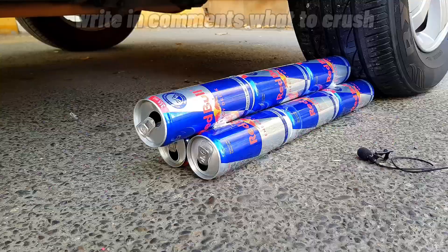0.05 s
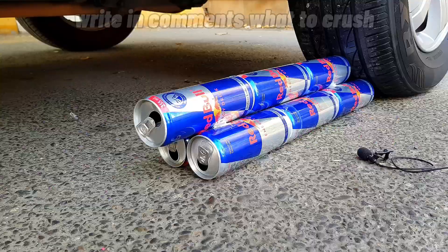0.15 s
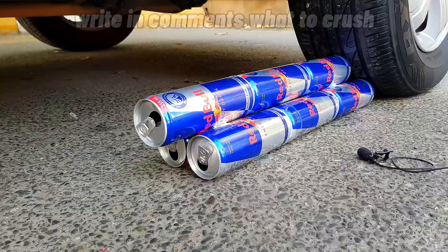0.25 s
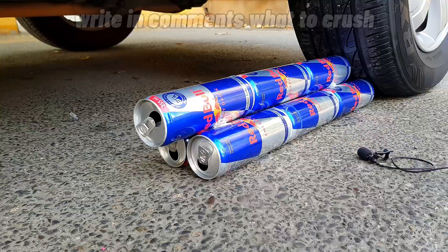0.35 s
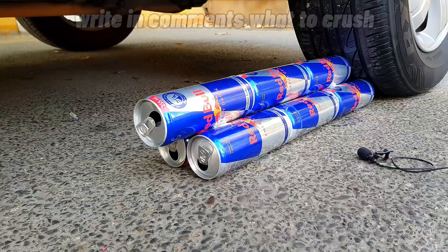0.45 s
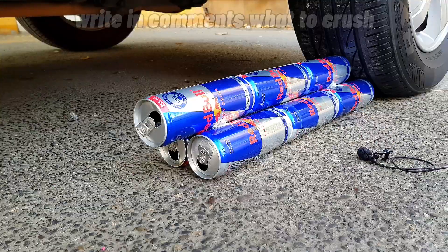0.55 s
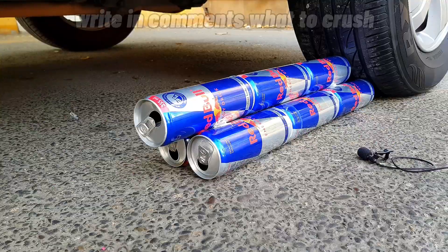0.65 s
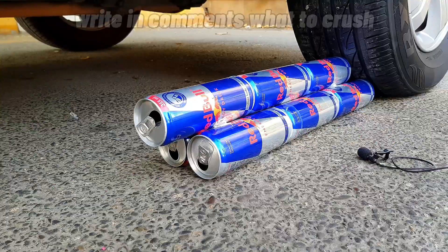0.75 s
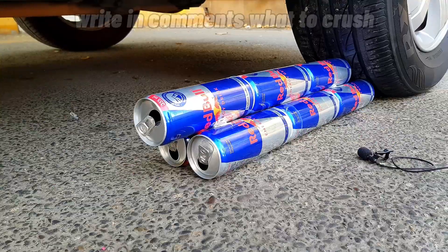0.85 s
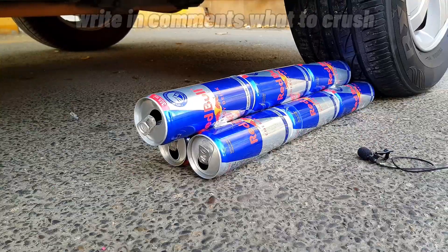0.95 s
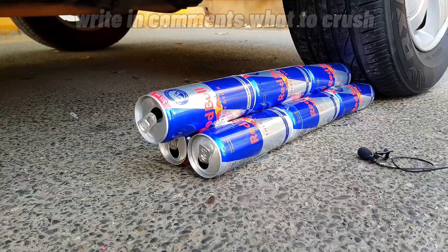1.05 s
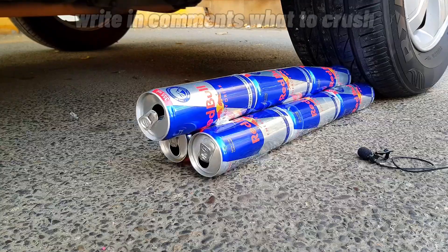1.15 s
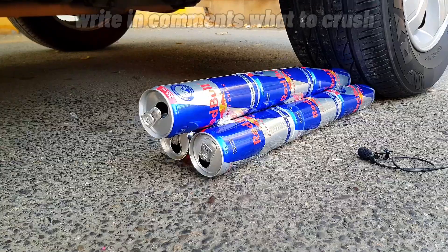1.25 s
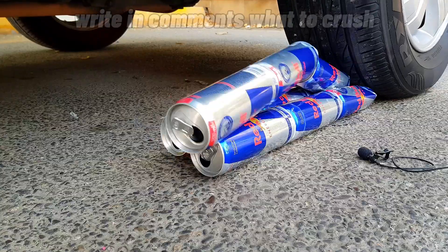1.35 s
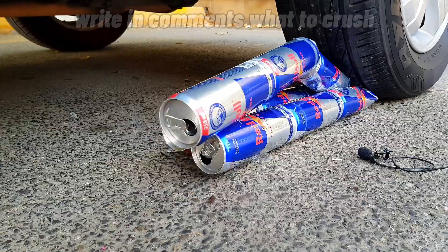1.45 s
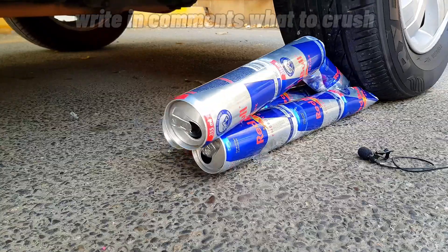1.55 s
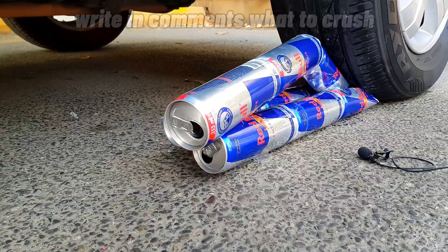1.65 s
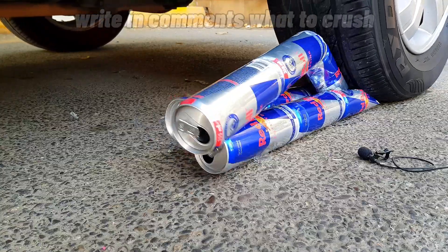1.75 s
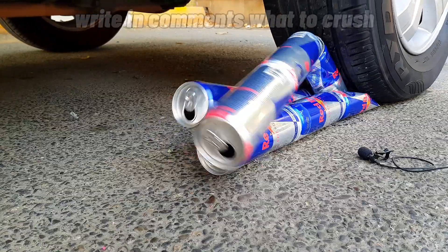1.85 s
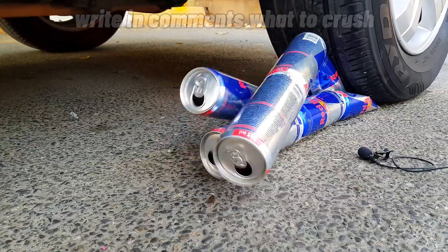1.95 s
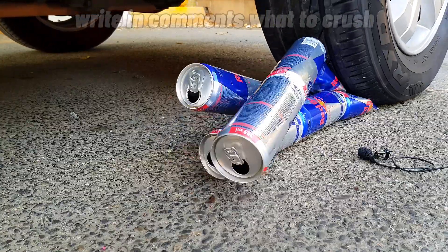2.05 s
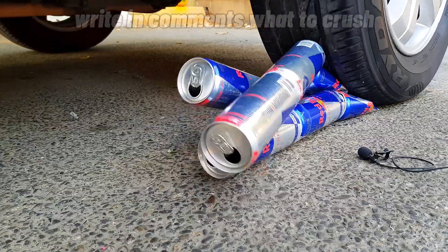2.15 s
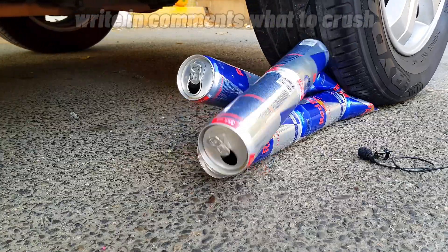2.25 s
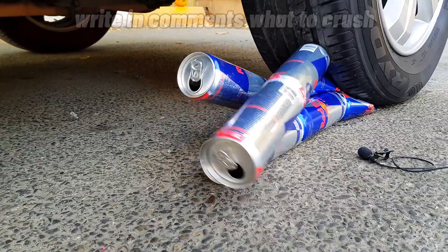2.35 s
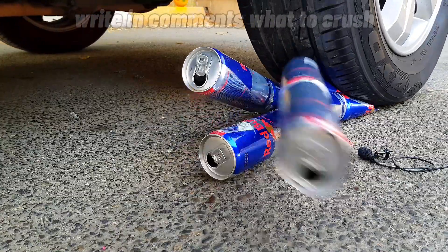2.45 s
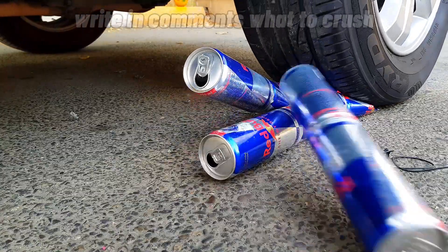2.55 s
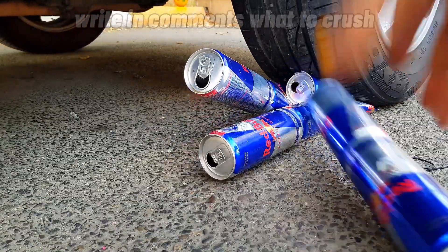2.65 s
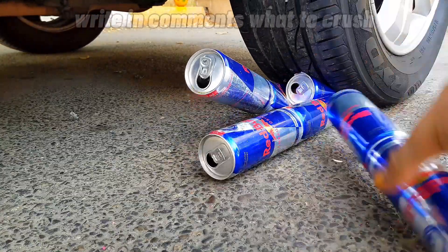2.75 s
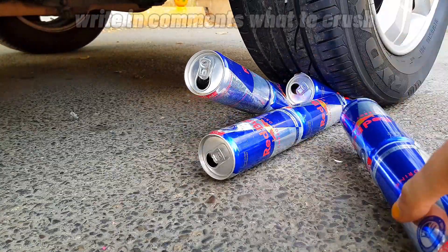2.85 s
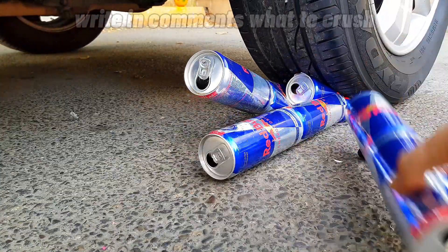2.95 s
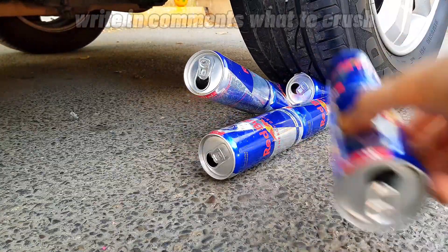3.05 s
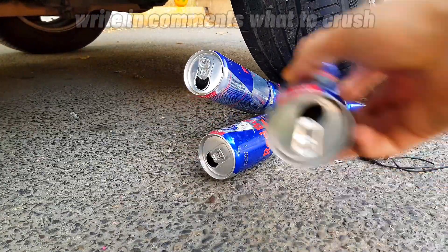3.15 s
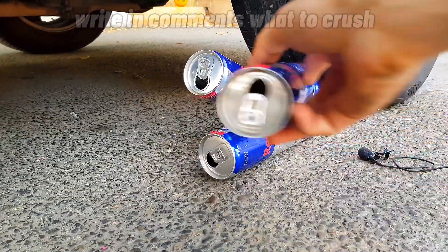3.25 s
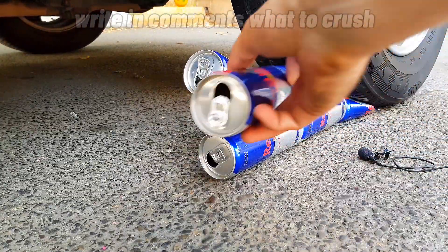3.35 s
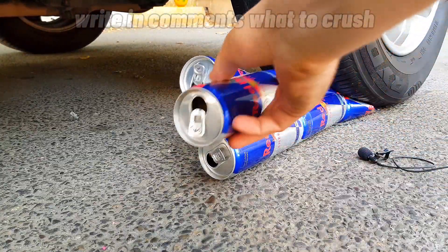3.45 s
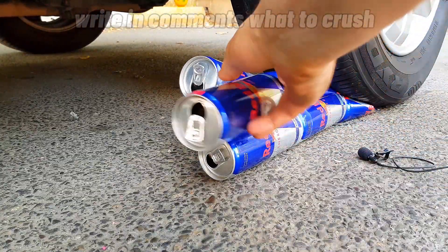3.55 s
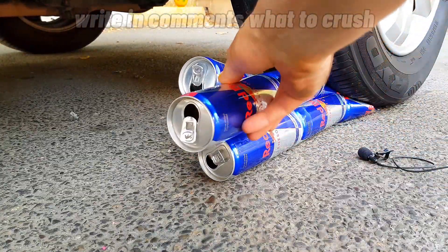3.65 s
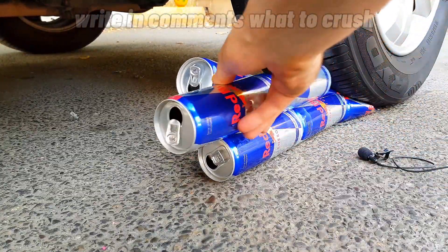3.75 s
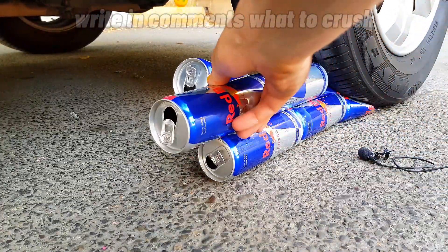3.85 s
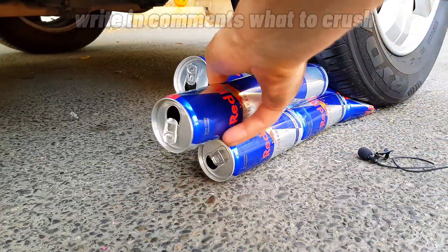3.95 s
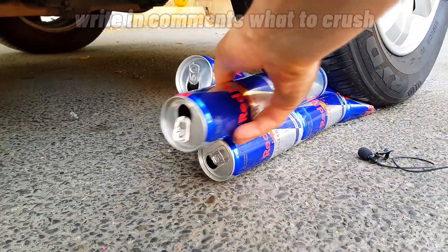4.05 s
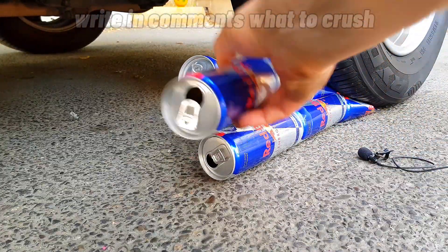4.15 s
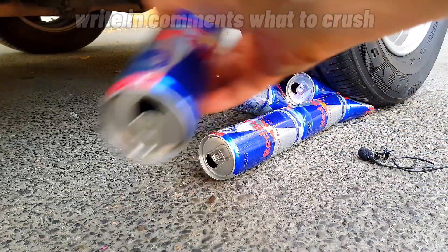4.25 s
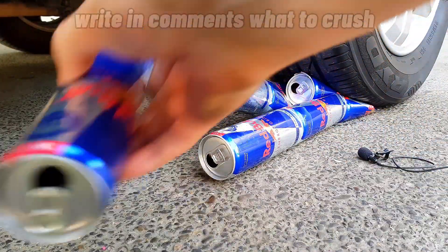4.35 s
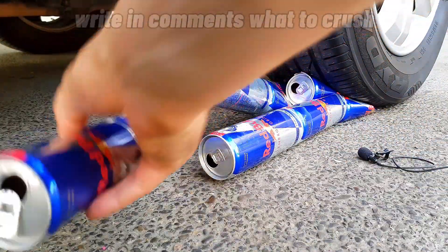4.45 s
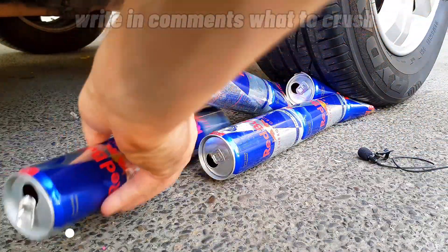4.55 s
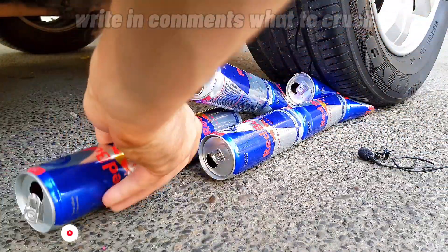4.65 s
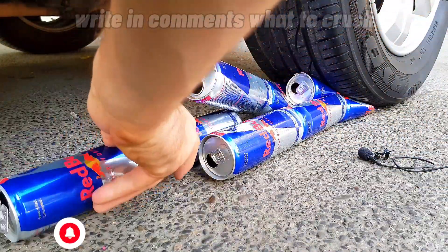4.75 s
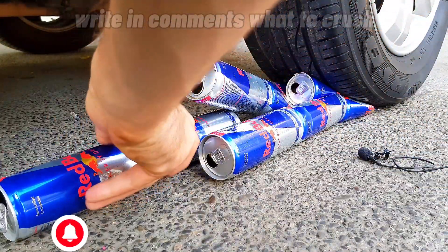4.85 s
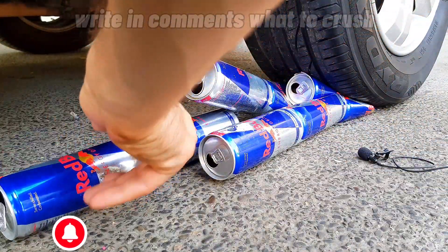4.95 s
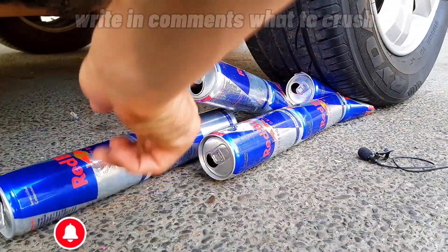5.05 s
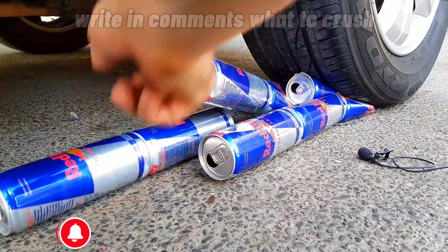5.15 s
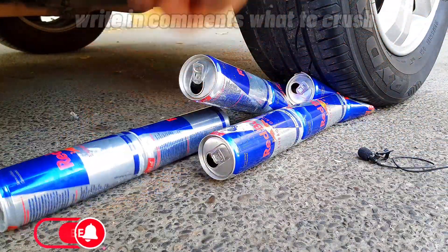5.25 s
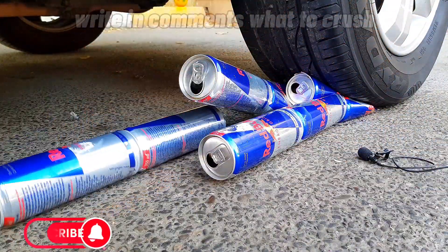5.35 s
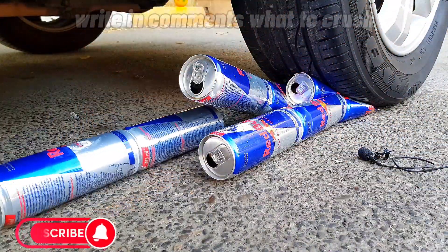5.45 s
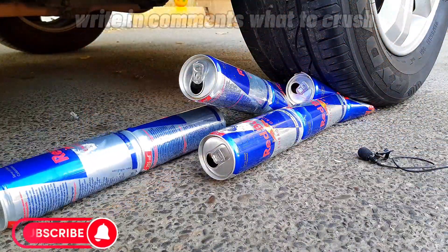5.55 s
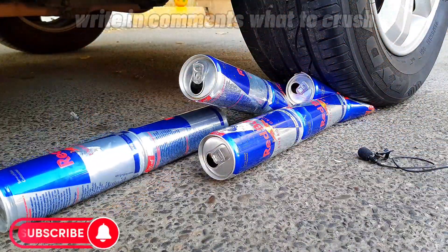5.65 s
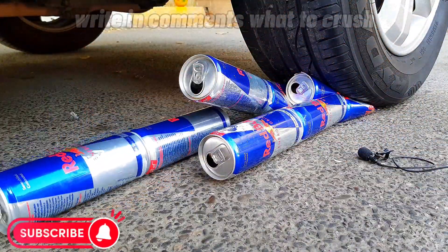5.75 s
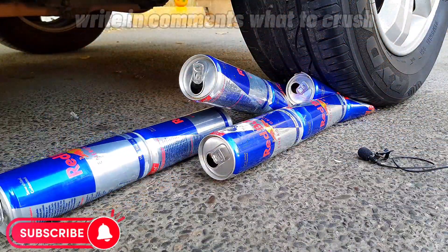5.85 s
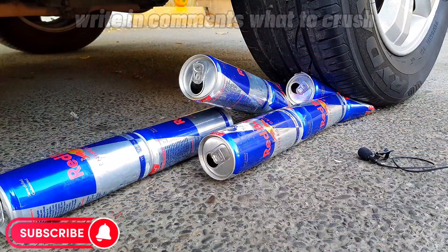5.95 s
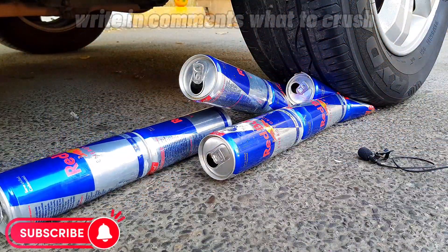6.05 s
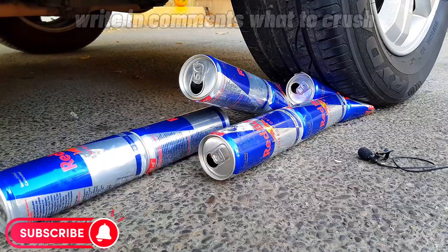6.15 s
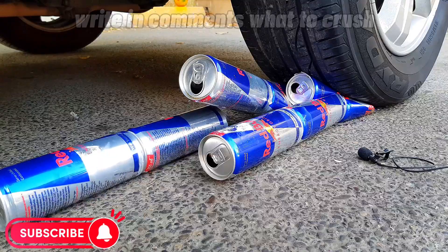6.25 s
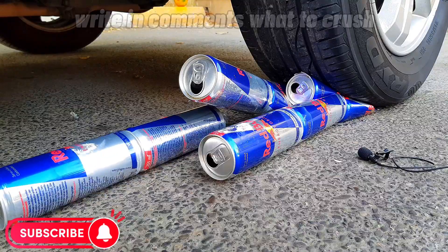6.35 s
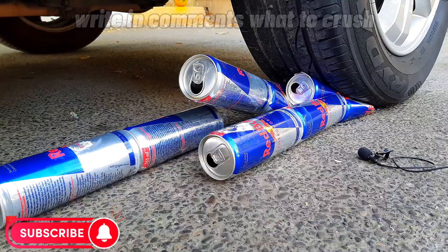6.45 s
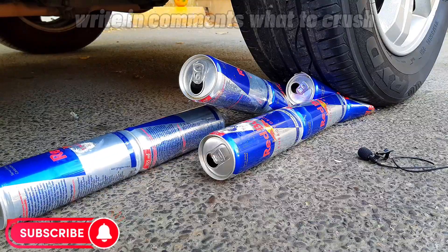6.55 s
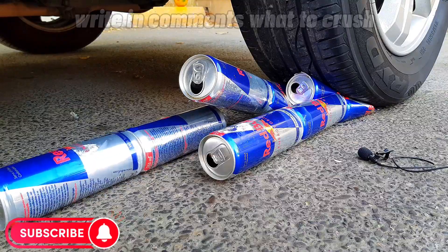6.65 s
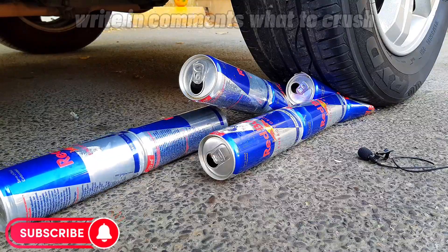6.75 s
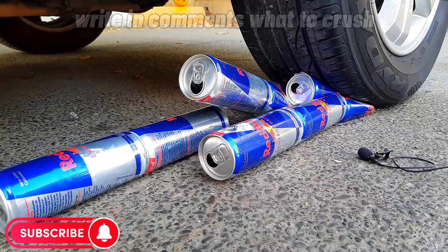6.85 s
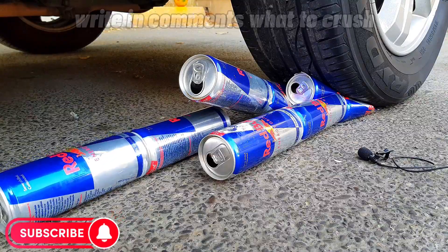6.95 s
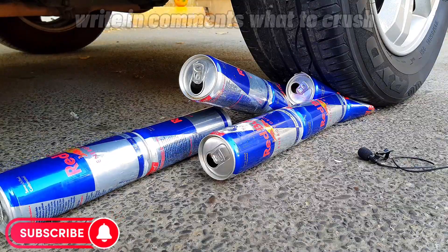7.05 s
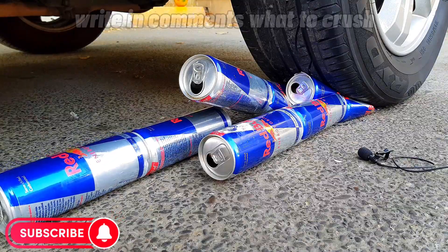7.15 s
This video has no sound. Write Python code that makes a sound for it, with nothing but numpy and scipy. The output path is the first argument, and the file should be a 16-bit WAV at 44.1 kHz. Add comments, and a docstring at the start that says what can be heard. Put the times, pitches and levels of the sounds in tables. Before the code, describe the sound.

A car idles, thin aluminium cans crunch and pop under its wheel, a stack clatters on asphalt, is handled, then only the idle remains.

```python
"""Taped stacks of empty drink cans buckle in sharp cracks under a car tyre, close to a small microphone.
Each crack is a click, a burst of fading noise and the notes of the dent and the new folds.
One stack springs free, clangs on the asphalt as a set of ringing notes, and is put back by hand with a rustle.
Air and ground give low thumps. Behind it the car idles, a throb of sine waves and noise that
sinks under the crunching and swells up again once it is quiet."""
import sys
import numpy as np
from scipy import signal
from scipy.io import wavfile

SR = 44100
rng = np.random.default_rng(int(sys.argv[2]) if len(sys.argv) > 2 else 0)


def generate_wav(sig):
    """Save sig (samples, or channels by samples) to the path in sys.argv[1] as 16-bit PCM at SR."""
    pcm = np.round(np.clip(np.atleast_2d(sig).T, -1, 1) * 32767).astype(np.int16)
    wavfile.write(sys.argv[1], SR, pcm)


N = 317508   # length in samples

# Speed of the idling engine: time_s, firings_per_s
IDLE_SPEED = [(0, 23.6), (5.1, 23.6), (5.2, 23.4), (6.1, 23.4), (6.2, 23.6), (7.2, 23.55)]
# Strength of each exhaust tone, before scaling: multiple_of_firing_rate, level_db
EXHAUST_TONES = [(1, -22), (2, -0.5), (3, 1), (4, -0.5), (5, -16), (6, -12), (7, -11), (8, -11.5),
                 (9, -21.5), (10, -14.5), (11, -17), (12, -15), (13, -15.5), (14, -17), (15, -28)]
# Colour of the engine hiss, before scaling: frequency_hz, level_db_per_hz
ENGINE_NOISE = [(90, -18.5), (200, -12.5), (320, -15), (410, -17.5), (600, -16.5), (1400, -25), (2000, -26),
                (6400, -37), (8000, -39), (13800, -44.5), (16000, -50.5)]
# Faint whistles in the engine hiss, relative to the exhaust: pitch_hz, width_hz, level_db
WHISTLES = [(604, 50, -23), (1770, 230, -27), (3182, 90, -33), (4360, 120, -36), (6350, 61, -34),
            (8100, 1500, -25), (8560, 130, -34.5), (8900, 80, -44), (11740, 200, -39), (13630, 130, -41)]
# Pushes of air and ground shock from big buckles and drops, before the low cut: start_s, level_db, length_ms
THUMPS = [(0.91, -8, 4.6), (1.118, -14.5, 2.2), (1.206, -13, 3.9), (1.311, -14, 3.8), (1.417, -11, 2),
          (1.587, -7, 4.4), (1.785, -11, 5), (1.988, -16, 6.2), (2.07, -12, 7.3), (2.149, -16.5, 4.9),
          (2.395, -15.5, 4.5), (2.562, -15.5, 7.6), (2.714, -1.5, 4), (2.824, -9.5, 5.7), (2.865, -16, 6.5),
          (3.076, -37, 3), (3.233, -24, 1.7), (3.278, -18.5, 5.2)]
# Fingers and tape sliding on the cans: loudest_s, level_db
SLIDES = [(3.28, -46.5), (3.36, -56), (3.44, -42.5), (3.72, -45.5), (3.82, -53.5), (3.93, -61),
          (4.06, -54.5), (4.138, -43.5), (4.64, -54), (4.76, -56)]
# The loose stack skids over the grit: start_s, end_s, level_db, fade_db_per_s
SKIDS = [(2.574, 2.722, -27.5, 112), (2.707, 2.903, -16.5, 78), (3.223, 3.42, -33, 170),
         (4.612, 4.713, -30.5, 250)]
# The stacks shake under the tyre, one row: start_s, end_s, level_db
SHAKE = (0.79, 2.9, -52.5)
# Ringing notes of a free stack, relative levels: pitch_hz, level_db, t60_s (time to fall by 60 dB)
STACK_NOTES = [(340, -21.5, 0.27), (744, -13.5, 0.41), (895, -8, 0.038), (1029, -13, 0.58),
               (1375, -21, 0.14), (1450, -17.5, 0.36), (1560, -15.5, 0.39), (1666, -11.5, 0.26),
               (1760, 3, 0.12), (1822, -15.5, 0.25), (1860, -16, .2), (2200, -17.5, .3), (2277, -12.5, 0.2),
               (2380, -14.5, 0.2), (2490, -19, 0.36), (2780, -23.5, 0.083), (3130, -17.5, 0.15),
               (3340, -21, 0.083), (3720, -7.5, 0.028), (3510, -11, 0.12), (3720, -23, 0.067),
               (3700, -19.5, 0.086)]
# Knocks on a stack, shorter when it is held, relative levels:
# start_s, peak_db, share_of_free_ring (0-1), hardness_db_per_octave
KNOCKS = [(1.304, -4, .84, -4.5), (1.416, -11, 1, 2), (2.395, -7.5, 0.73, 8), (2.489, -20, 0.8, -1),
          (2.56, 13, 0, -3.5), (2.717, -7, .05, 1), (2.728, -12.5, 1, 16.5), (2.78, -14.5, .9, -7),
          (3.077, -17, 0.03, -3), (3.23, -0.5, 0.09, -15), (3.281, -25, .6, -3), (3.884, -10, 0.54, 1),
          (4.06, -14, 0.96, -1), (4.613, -19.5, 0.45, 1), (4.625, -16, 0.9, -7.5), (4.754, -21, 0.9, -7)]
# How the thin can wall colours a crack: frequency_hz, level_db
CAN_WALL = [(250, 5), (420, 0.5), (700, 2), (1800, -0.5), (3000, -4.5), (6000, -4), (9000, -4), (12000, -6),
            (16000, -27.5)]
# Buckling walls, relative levels: start_s, snap_db, boom_db, dent_db, dent_pitch_hz, t60_s (basic fading time)
CRACKS = [(0.617, -26, -37, -42, 2150, 0.05), (0.6794, 1, -41, -13, 2146, 0.059),
          (0.7093, -44, -32, -10.5, 2170, 0.04), (0.7809, 0, -33.5, -13.5, 2300, 0.054),
          (0.8303, 1, -21.5, -9.5, 830, 0.052), (0.849, 1, -31.5, -18, 2550, 0.047),
          (0.8734, -8, -29, -17, 2680, 0.04), (0.9022, -9, -40, -14, 1447, 0.1),
          (0.9071, 8.5, -21.5, -16, 3140, 0.05), (0.952, 2, -31, -7.5, 1440, 0.053),
          (0.9885, -10.5, -22, -18.5, 1920, 0.033), (1.0266, -1, -24, -17.5, 3000, 0.036),
          (1.0323, -1, -21, -10, 2550, 0.032), (1.0712, -21, -40, -36, 2960, 0.05),
          (1.0782, -1.5, -15, -7.5, 1960, 0.05), (1.0964, -16, -43, -17, 2330, 0.017),
          (1.1137, -6, -23, -11, 2180, 0.041), (1.1204, -3, -20.5, -6, 1920, 0.042),
          (1.1329, -3, -23, -13, 2210, 0.04), (1.1494, -13, -40, -28, 1720, 0.046),
          (1.1648, -10, -28, -22.5, 942, 0.048), (1.1902, -4, -6.5, -16.5, 1340, 0.028),
          (1.2037, 8.5, -22, -16.5, 1105, 0.049), (1.218, -2.5, -29, -21, 1020, 0.071),
          (1.239, 0.5, -28.5, -18.5, 3170, 0.028), (1.2553, -5.5, -32.5, -18, 3290, 0.048),
          (1.284, 1, -26.5, -22.5, 1460, 0.042), (1.3036, 2, -10.5, -5, 1638, 0.098),
          (1.3139, 7, -18.5, -6, 1942, 0.12), (1.3638, -2, -38, -13, 1480, 0.039),
          (1.3708, -0.5, -31.5, -13.5, 1350, 0.064), (1.4073, 0.5, -23.5, -16, 3340, 0.04),
          (1.4159, 4, -16, -9, 860, 0.047), (1.4306, 1, -24, -10.5, 1724, 0.043),
          (1.46, -15, -29, -19.5, 1900, 0.066), (1.4952, -12.5, -16, -11, 840, 0.029),
          (1.5567, -12.5, -14.5, -16, 925, 0.018), (1.574, -10, -35, -19.5, 1840, 0.05),
          (1.585, 8.5, -19, -12, 845, 0.082), (1.6359, 1, -15, -6.5, 874, 0.042),
          (1.6803, -1, -20, -19, 2080, 0.054), (1.7181, 2, -28, -10, 2890, 0.024),
          (1.7758, -1, -18, -25, 2560, 0.041), (1.7854, 2, -22, -30, 1765, 0.09),
          (1.8004, 1.5, -15, -11.5, 840, 0.036), (1.8228, -15, -53, -19, 1780, 0.038),
          (1.8444, -20, -20.5, -28, 802, 0.073), (1.8665, 1, -14, -21, 1320, 0.055),
          (1.8843, -9, -37, -12, 2210, 0.06), (1.904, 1, -19.5, -15.5, 890, 0.035),
          (1.9249, -7.5, -14, -7.5, 2220, 0.05), (1.9509, 3.5, -14, -5, 830, 0.026),
          (1.9758, -12, -23.5, -16.5, 2180, 0.077), (1.9849, 7, -10, -18, 1130, 0.077),
          (2.0144, -15, -20, -16.5, 844, 0.12), (2.0255, 1, -20, -13, 2030, 0.043),
          (2.046, -29, -25, -11, 2030, 0.05), (2.0718, 4, -10, -20, 1430, 0.034),
          (2.096, -19, -26, -24, 2810, 0.14), (2.1167, -1, -28, -33, 2640, 0.027),
          (2.15, 2, -14, -13.5, 1500, 0.041), (2.176, -19, -45, -19.5, 2680, 0.038),
          (2.1983, -15, -21, -16, 1880, 0.058), (2.2067, -7, -17, -11.5, 3150, 0.02),
          (2.212, -15, -14, -11, 2240, 0.035), (2.2334, -4.5, -31.5, -22, 3160, 0.034),
          (2.2494, -13, -18, -26, 1860, 0.033), (2.2858, -4.5, -18, -25.5, 1740, 0.044),
          (2.2942, 2.5, -23, -13.5, 1570, 0.025), (2.3064, -14.5, -34.5, -18, 2990, 0.045),
          (2.3234, -19, -26.5, -21.5, 1770, 0.075), (2.3531, -8.5, -12, -12.5, 1740, 0.034),
          (2.3844, -5, -26, -23, 810, 0.079), (2.393, 2, -21.5, -9.5, 1770, 0.062),
          (2.4279, -17, -34, -5, 3060, 0.026), (2.4363, -4.5, -48, -18, 1800, 0.019),
          (2.4484, -6.5, -42, -22, 1730, 0.043), (2.459, -6, -30, -26, 1630, 0.039),
          (2.4762, -3.5, -27, -29, 1290, 0.019), (2.489, -15, -25, -23.5, 1700, 0.023),
          (2.544, -22, -28.5, -39, 1580, 0.045), (2.559, -2.5, -23, -5, 1776, 0.084),
          (2.5724, -12.5, -36.5, -15.5, 1920, 0.041), (2.599, -7, -50, -16, 1740, 0.026),
          (2.6054, -14.5, -41.5, -15, 1910, 0.047), (2.6554, -26, -30, -19.5, 1850, 0.036),
          (2.6751, -13, -43, -17, 1770, 0.094), (2.7113, -1.5, -5, -16, 942, 0.018),
          (2.7176, -7, -14, -9, 1730, 0.038), (2.7258, -16, -25, -8, 1765, 0.087),
          (2.7803, -8.5, -22, -19, 1770, 0.02), (2.794, -30, -30, -31, 1680, 0.022),
          (2.8273, -20, -40, -21, 1720, 0.038), (2.8406, -7, -29, -28, 1770, 0.044),
          (2.8568, -19, -28, -23, 1770, 0.04), (2.8767, -25, -41, -22, 1770, 0.093),
          (2.9257, -25, -48, -36, 980, 0.05), (3.0147, -12, -50, -31, 2440, 0.037),
          (3.0749, -0.5, -16, -33, 1050, 0.032), (3.101, -18, -62.5, -40, 2450, 0.03),
          (3.1464, -58, -28, -29, 818, 0.054), (3.2012, -20, -35, -36, 2170, 0.018),
          (3.2301, -25, -12, -11.5, 1850, 0.057), (3.277, -21.5, -41, -27.5, 1860, 0.1),
          (3.4493, 0.5, -34, -39, 2200, 0.018), (3.4676, -19.5, -41, -35, 1990, 0.04),
          (3.5481, -36, -47, -27, 2930, 0.025), (3.5547, -8.5, -54, -31.5, 2510, 0.043),
          (3.6328, -11, -31, -27, 2400, 0.042), (3.6408, -17, -32, -23, 2510, 0.039),
          (3.6558, -20, -52, -33, 2420, 0.019), (3.7543, -16.5, -48, -35, 2380, 0.03),
          (3.7895, -22.5, -51, -38, 2420, 0.031), (3.8847, -0.5, -52, -11.5, 2685, 0.042),
          (3.8921, -5, -49, -24, 1650, 0.033), (3.9185, -24, -42, -35, 1670, 0.025),
          (3.947, -28, -47, -42, 2390, 0.04), (3.9554, -42, -36, -29.5, 890, 0.064),
          (3.9781, -11, -26.5, -19.5, 1930, 0.021), (4.0596, -5.5, -34, -23, 1410, 0.055),
          (4.0717, -5.5, -40, -20.5, 976, 0.056), (4.6112, -27.5, -36, -26, 1800, 0.038),
          (4.6249, -34, -36, -24.5, 1640, 0.069), (4.7366, -41, -41.5, -42, 1350, 0.1),
          (4.753, -17.5, -40, -46, 1750, 0.082), (5.0797, -36.5, -52, -56, 987, 0.072),
          (5.4136, -11.5, -58, -53, 1850, 0.029)]

IDLE_DB, SUNK_DB = -27.5, -44   # exhaust level in the quiet, and under the crunching
SINKS_AT_S, SINK_S, RISES_AT_S, RISE_S = 0.69, .25, 4.85, 1.17   # start and time constant of each change
SLIDE_RISE_DB_PER_S, SLIDE_FALL_DB_PER_S = 358.5, 220
SKID_RISE_S = 0.029
SNAP_HZ, BELOW_SNAP_DB_PER_OCT = 4500, 7.5   # the snap thins out below this corner
BOOM_HZ, BOOM_LOSS_DB_PER_OCT = 640, 11   # the hollow of the can
DENT_OCTAVES = 0.89   # width of the dent's colour
BELOW_DENT_DB, ABOVE_DENT_DB = 8, 6   # loss per dent width on either side
MIC_LOW_CUT_HZ, CUTOFF_HZ = 49, 16900


def from_db(db):
    """Turn a level in dB into a gain."""
    return np.exp(np.asarray(db) * (np.log(10) / 20))


def rms_one(x):
    """Scale a signal to an average strength (rms) of 1."""
    return x / np.sqrt(np.mean(x ** 2) + 1e-20)


def in_time(rows):
    """Draw lines between (time, value) rows, giving one value a sample."""
    return np.interp(np.arange(N) / SR, *np.transpose(rows))


def at_hz(points, hz):
    """Read a spectrum on a log-frequency axis."""
    known_hz, level_db = np.array(points).T
    return np.interp(np.log(hz), np.log(known_hz), level_db)


def drift(rate_hz):
    """Slow random wandering with spread 1: noise smoothed at one value per 40 samples."""
    r = np.exp(-80 * np.pi * rate_hz / SR)
    noise = rng.standard_normal(N // 40 + 2002)
    slow = signal.lfilter([1], [1, -2 * r, r * r], noise)[2000:]   # skip the start-up
    return np.interp(np.arange(N) / 40, np.arange(len(slow)), rms_one(slow))


def ring(clicks, hz, t60):
    """A resonance: each unit click sets a sine of height 1 ringing, 60 dB down after t60 seconds."""
    r = 10 ** (-3 / (t60 * SR))
    w = 2 * np.pi * hz / SR
    return signal.lfilter([0, np.sin(w)], [1, -2 * r * np.cos(w), r * r], clicks + 1e-18)


def bank(x, low_hz):
    """Split sound into third-octave bands, dealing the two rows of x in turn; gives centres and bands."""
    edges = low_hz * 2 ** np.arange(0, np.log2(18000 / low_hz), 1 / 3)
    bands = []
    for k, edge in enumerate(zip(edges, edges[1:])):
        band_pass = signal.butter(2, edge, "band", fs=SR, output="sos")
        bands.append(signal.sosfilt(band_pass, x[k % 2]))
    return np.sqrt(edges[1:] * edges[:-1]), np.array(bands)


def idle_db():
    """The idle level sinks near the start of the crunching and creeps back late, at set times."""
    t = np.arange(N) / SR
    sinking = 1 - np.exp(-np.maximum(t - SINKS_AT_S, 0) / SINK_S)
    returning = np.exp(-np.maximum(t - RISES_AT_S, 0) / RISE_S)
    return IDLE_DB + (SUNK_DB - IDLE_DB) * sinking * returning


def engine():
    """Firings drive exhaust tones, the lowest lagging most in the pipe; noise throbs along, more in the bass."""
    turns = np.cumsum(in_time(IDLE_SPEED)) / SR + 0.305   # firings so far
    waver_db, pulse_db, pipe_lag = 1.3, 4.5, 113   # the lag is in radians
    exhaust = 0
    for k, db in EXHAUST_TONES:
        height = from_db(db + waver_db * drift(5.2))
        exhaust = exhaust + height * np.cos(2 * np.pi * k * turns + pipe_lag / k + 0.14 * drift(6.0))

    hz, bands = bank(rng.standard_normal((2, N)), low_hz=101.4)
    throb_db = pulse_db * (300 / hz[:, None]) ** 1.2 * np.cos(2 * np.pi * turns + 0.42)
    noise_gain = from_db(at_hz(ENGINE_NOISE, hz)[:, None] + throb_db)
    hiss = rms_one(np.sum(noise_gain * bands, axis=0))

    white = rng.standard_normal(N)
    whistles = 0
    for hz, width, db in WHISTLES:
        t60 = np.log(1000) / (np.pi * width)   # a narrow whistle rings longer
        whistles = whistles + from_db(db + 1.6 * drift(14.0)) * rms_one(ring(white, hz, t60))
    return from_db(idle_db()) * (rms_one(exhaust) + from_db(-11.0) * hiss + whistles)


def thumps():
    """Smooth one-sided pulses of pressure; the microphone's low cut turns them into falling booms."""
    out = np.zeros(N)
    for s, level_db, length_ms in THUMPS:
        pulse = np.hanning(max(round(length_ms * SR / 1000), 9))
        out[round(s * SR):][:len(pulse)] -= from_db(level_db) * pulse
    low_cut = signal.butter(4, MIC_LOW_CUT_HZ, "high", fs=SR, output="sos")
    return signal.sosfilt(low_cut, out + 1e-18)


def sliding():
    """Gain of the rubbing hand: each slide swells quickly and dies away more slowly."""
    t = np.arange(0, N / SR, .002)
    gain = 0
    for s, db in SLIDES:
        loss_db = np.maximum(SLIDE_RISE_DB_PER_S * (s - t), SLIDE_FALL_DB_PER_S * (t - s))
        gain = gain + from_db(db - loss_db)
    return in_time(np.transpose([t, gain]))


def skidding():
    """Gain of the scraping grit: each skid bites quickly, fades and stops; the shaking holds level."""
    t = np.arange(0, N / SR, .002)
    shake_start, shake_end, shake_db = SHAKE
    gain = from_db(shake_db) * ((t > shake_start) & (t < shake_end))
    for start, end, db, fade_db in SKIDS:
        rise = np.clip((t - start) / SKID_RISE_S, 0, 1)
        gain = gain + rise * (t < end) * from_db(db - fade_db * np.clip(t - start, 0, 1))
    return in_time(np.transpose([t, gain]))


def clangs():
    """Knocks and grit strike every mode (natural note) of the stack, each with a strength of its own."""
    hz, level_db, t60 = np.transpose(STACK_NOTES)[:, :, None]
    t, out = np.arange(SR // 3) / SR, np.zeros(N + SR)
    chance = rng.standard_normal((len(KNOCKS), 2, len(STACK_NOTES), 1))
    for (s, peak_db, free, hard_db), (strength, bend) in zip(KNOCKS, chance):
        hardness_db = hard_db * np.log2(np.maximum(hz, 700) / 1500)
        fade_db = 60 * t / (np.clip(free, .05, 1) * t60)
        dying = from_db(peak_db - 12.0 + level_db + hardness_db + 2.8 * strength - fade_db)
        modes = dying * np.sin(2 * np.pi * hz * (1 + 0.0052 * bend) * t)   # dents shift the modes a little
        out[round(s * SR):][:len(t)] += modes.sum(axis=0) * np.minimum(t / 0.00082, 1)

    grit = (rng.random(N) < 500 / SR) * skidding()   # about 500 grains a second
    grit = grit[:round(5.2 * SR)]
    hits = grit * rng.standard_normal(len(grit))
    for f, db, lasts in STACK_NOTES:
        out[:len(hits)] += from_db(db) * ring(hits, f, 0.81 * lasts * min(1900 / f, 1))
    return out[:N]


def grains(per_s, spread_db, cycles):
    """Clumped tiny snaps, each ringing a few cycles at one of 14 pitches; rms 1."""
    sizes = from_db(spread_db * np.minimum(rng.exponential(1, N), 5)) * rng.choice([-1, 1], N)
    born = rng.random(N) < per_s * from_db(4.0 * drift(20)) / SR
    pitches, dealt = np.geomspace(900, 11500, 14), rng.integers(0, 14, N)
    out = 0
    for k, hz in enumerate(pitches):
        out = out + ring(sizes * born * (dealt == k), hz, cycles / hz) * (hz / 4000) ** 0.61
    return rms_one(out)


def creases(buckling):
    """Small folds follow in the wake of each buckle; handling adds a denser rustle of shorter snaps."""
    r = np.exp(-1 / (.012 * SR))   # the wake follows the cracks with a 12 ms memory
    wake = np.sqrt(signal.lfilter([1 - r], [1, -r], buckling ** 2 + 1e-18))
    folding = from_db(-16) * wake * grains(per_s=6000, spread_db=2.5, cycles=25.0)
    rustle = sliding() * grains(per_s=14000, spread_db=1.0, cycles=15.0)
    return folding + rustle


def crack_colour(f, snap_db, boom_db, dent_db, dent_hz):
    """Strength of one crack at frequency f: hollow boom plus bright snap, joined by a peak at the dent."""
    boom = from_db(boom_db + 6.5 - BOOM_LOSS_DB_PER_OCT * np.abs(np.log2(f / BOOM_HZ)))
    snap = from_db(snap_db - 5.5 + BELOW_SNAP_DB_PER_OCT * np.minimum(np.log2(f / SNAP_HZ), 0))
    widths_away = np.abs(np.log2(f / dent_hz) / DENT_OCTAVES)
    dent = from_db(dent_db + 4 - np.where(f < dent_hz, BELOW_DENT_DB, ABOVE_DENT_DB) * widths_away)
    return np.hypot(boom + snap, dent)


def cracks():
    """Each buckle is a snap, a burst of dense wall modes whose treble dies first, and notes of dent and folds."""
    size = SR // 6
    t, out = np.arange(size) / SR, np.zeros(N + size)
    hz, noise = bank(rng.standard_normal((2, N + size)), low_hz=221.4)
    click = np.eye(1, size).repeat(2, axis=0)
    snap = bank(click, low_hz=214.0)[1]
    chance = rng.standard_normal((len(CRACKS), len(hz)))
    panels_hz = 900 * 2 ** rng.uniform(0, 3.5, (len(CRACKS), 8, 1))   # each fold leaves panels of its own size
    spike = 1 + 1.15 * np.exp(-t / 0.0017)   # the first moments stand out
    for (s, snap_db, boom_db, dent_db, dent_hz, t60), uneven, panel_hz in zip(CRACKS, chance, panels_hz):
        i, n = round(s * SR), min(size, round(2.2 * t60 * SR))
        t = np.arange(n) / SR
        levels = snap_db, boom_db, dent_db, dent_hz
        gain = crack_colour(hz, *levels) * from_db(at_hz(CAN_WALL, hz) + 1.79 * uneven)
        lasts = t60 * (hz[:, None] / 5000) ** -.35
        burst = noise[:, i:i + n] * from_db(-60 * t / lasts) * spike[:n]
        walls = np.sum(gain[:, None] * (burst + 8.8 * snap[:, :n]), axis=0)

        dent_fade = from_db(-8.5 - 60 * t / (1.2 * t60))
        dent = crack_colour(dent_hz, *levels) * dent_fade * np.sin(2 * np.pi * dent_hz * t)
        panel_fade = from_db(-19 - 60 * t / (1.4 * t60))
        panels = crack_colour(panel_hz, *levels) * panel_fade * np.sin(2 * np.pi * panel_hz * t)
        out[i:i + n] += walls + dent + panels.sum(axis=0)
    return out[:N]


def scene():
    """Cans and engine add up at one microphone."""
    buckling = cracks()
    return (buckling + creases(buckling) + clangs() + thumps() + engine())[None]


def record(dry):
    """Round off the peaks, then cut the highest treble."""
    top = .84
    rounded = top * np.tanh(dry / top)
    return signal.sosfilt(signal.cheby2(16, 95, CUTOFF_HZ, fs=SR, output="sos"), rounded)


dry = scene()
out = record(dry)
generate_wav(out)
```